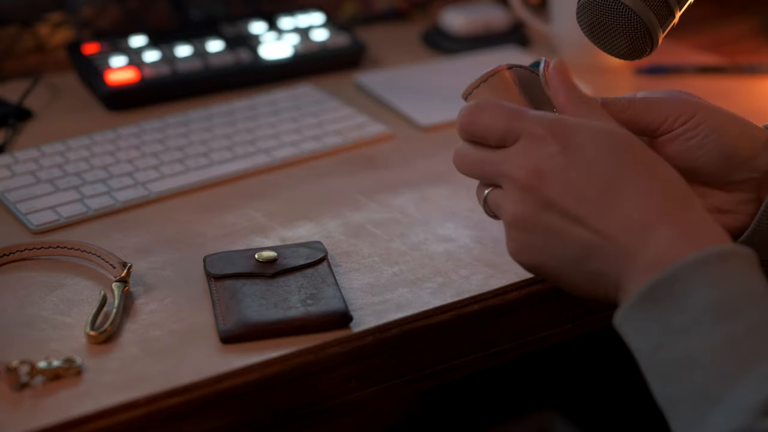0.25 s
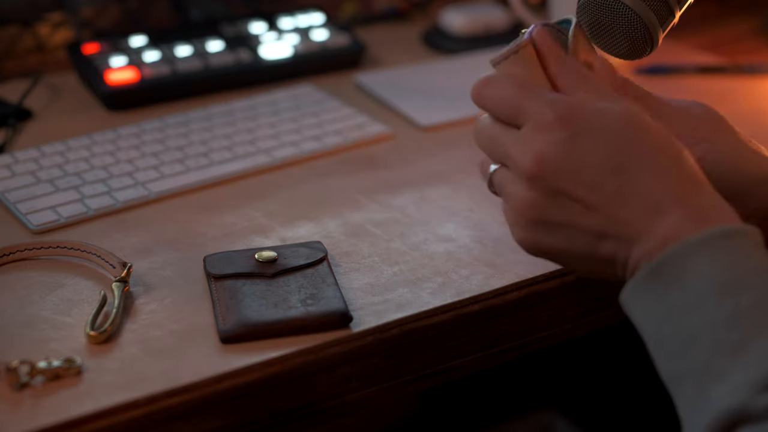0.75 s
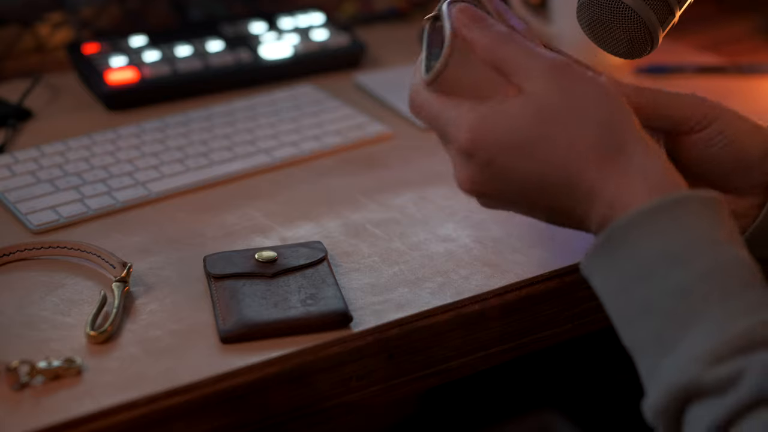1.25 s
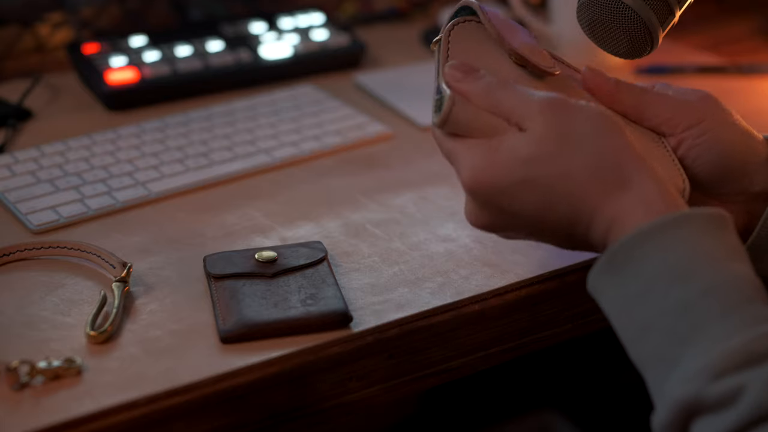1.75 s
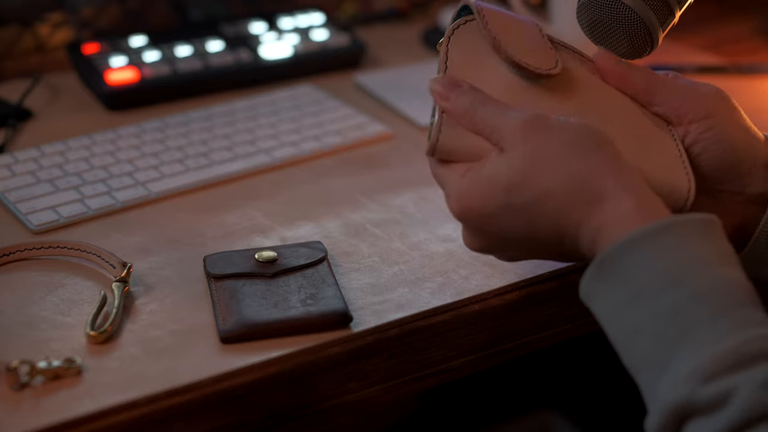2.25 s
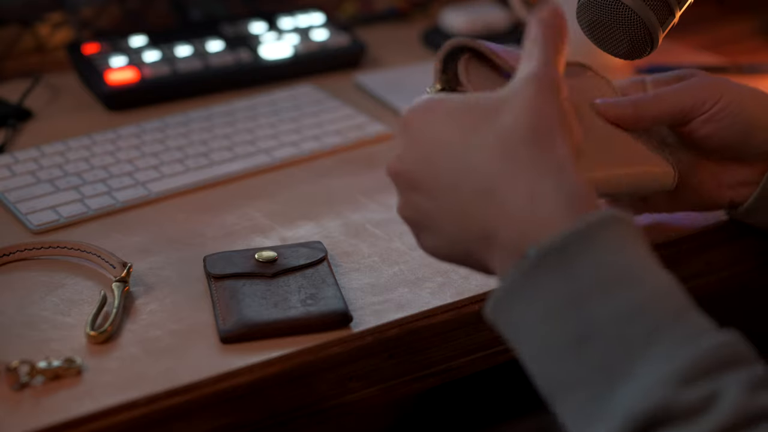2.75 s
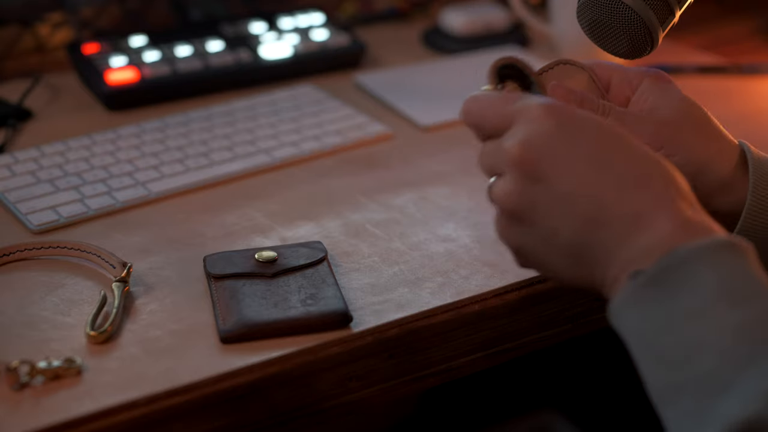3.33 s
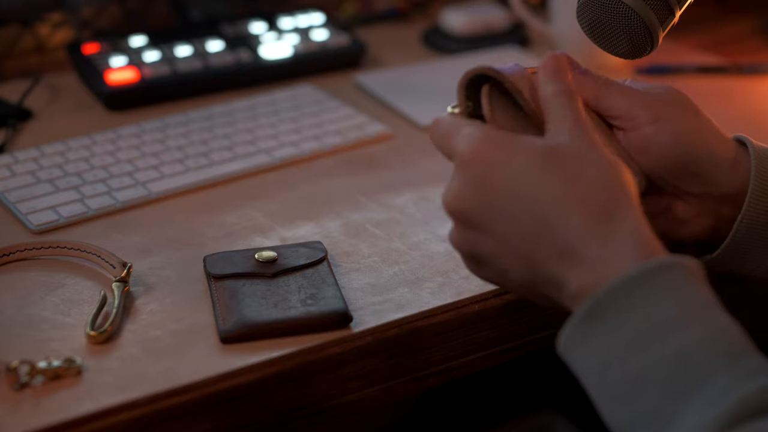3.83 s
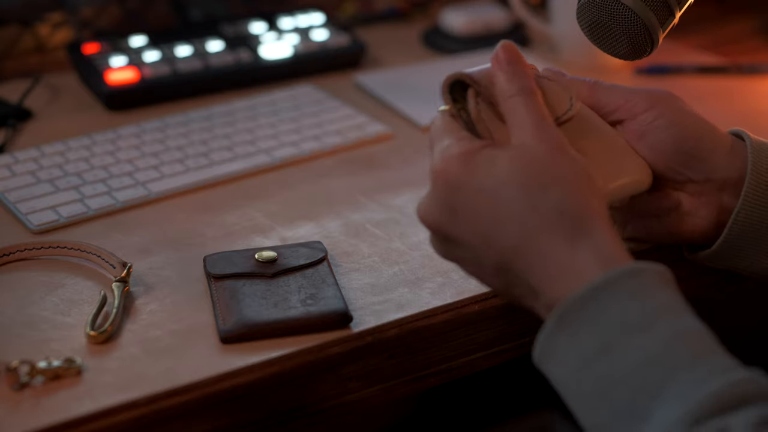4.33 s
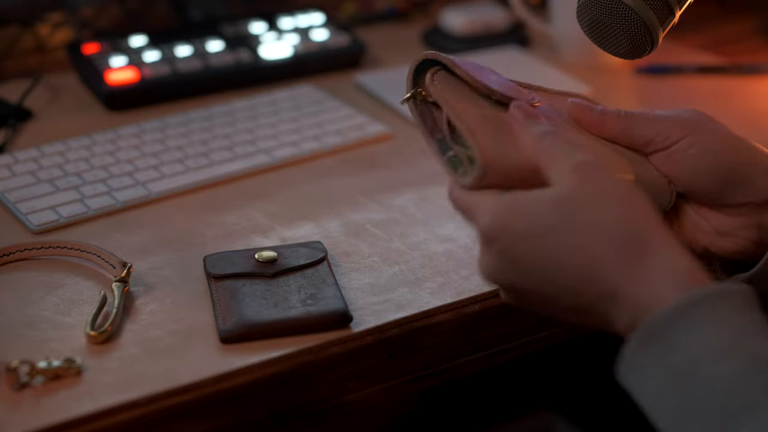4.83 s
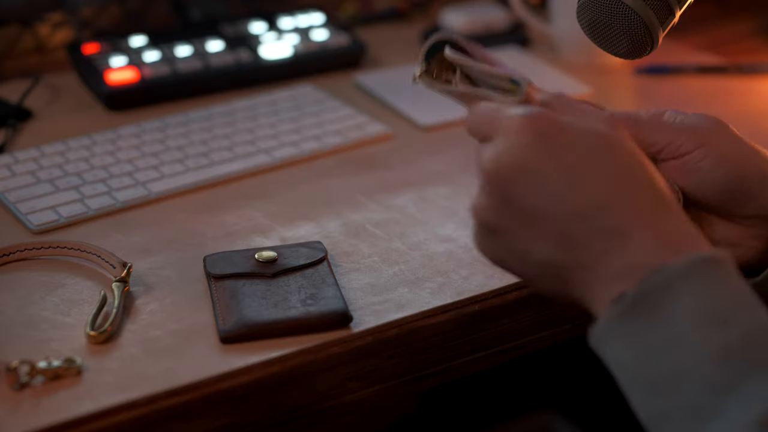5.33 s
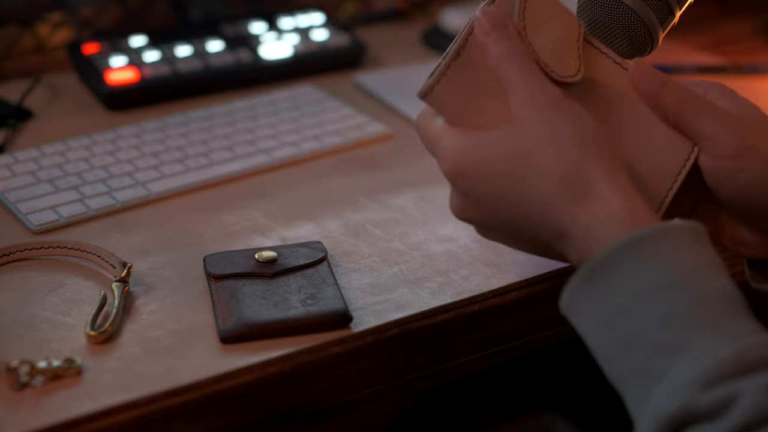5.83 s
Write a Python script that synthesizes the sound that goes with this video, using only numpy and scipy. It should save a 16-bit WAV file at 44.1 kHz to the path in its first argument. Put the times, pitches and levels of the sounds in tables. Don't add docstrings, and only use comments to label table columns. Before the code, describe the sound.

Very close to a desk microphone in a quiet room, hands work a stiff leather wallet. Sharp cracks and a dull thump come first, then a near lull. A fine creak swells into dense ticking, followed by scattered crackles. A roll pulled tight ratchets louder and louder, stops, and squeaks faintly. Kneading snaps and a brief hollow pocket note follow, fading into light rustles.

```python
import sys
import numpy as np
from scipy import signal
from scipy.fft import rfft, irfft, next_fast_len
from scipy.io import wavfile
from scipy.ndimage import uniform_filter1d, map_coordinates

SR = 44100
rng = np.random.default_rng(int(sys.argv[2]) if len(sys.argv) > 2 else 0)


def magnitude_from_level(level_db):
    exponent = np.asarray(level_db, float) / 20
    return 10 ** exponent


def waveform_to_disk(signal):
    frames = np.transpose(np.atleast_2d(signal))
    scaled = np.clip(frames, -1, 1) * 32767
    samples = np.round(scaled).astype(np.int16)
    wavfile.write(sys.argv[1], SR, samples)


N = 268128

# pitch_hz, level_db
ROOM_HISS = [(15, -40.5), (25, 0.5), (135, -4), (470, -7.5), (634, -16.5), (854, -7.5), (1360, -22),
             (8140, -19), (14800, -18.5), (16500, -16)]
# pitch_hz, width_hz, level_db
DESK_MODES = [(86.4, 23, -1.5), (158, 126, -6.5), (283, 290, -9.5)]
# pitch_hz, width_hz, level_db
POCKET_MODES = [(350, 140, -15), (656, 84, -5.5), (780, 72, -2), (1100, 654, -3), (1840, 3730, -8.5)]
# pitch_hz, level_db
GRAIN_HISS = [(530, -66), (900, -9), (1670, -2.5), (2690, -9), (3970, 0), (7850, 4), (15200, -14),
              (15900, -5), (16500, -88)]
# hardest_s, rubbing_db, swell_s, fade_s
FINGER_STROKES = [(.065, -61, 0.16, 0.28), (.234, -56, 0.12, 0.16), (0.349, -44.5, 0.013, 0.057),
                  (0.662, -50.5, 0.28, 0.12), (0.855, -60.5, 0.077, 0.063), (.95, -66, 0.065, 0.052),
                  (1.15, -78, 0.49, 0.27), (1.33, -71.5, 0.1, 0.31), (1.56, -79, 0.17, 0.037),
                  (1.907, -56, 0.27, 0.057), (2.049, -53, 0.12, 0.27), (2.2, -62.5, 0.037, 0.16),
                  (2.31, -55.5, 0.11, 0.05), (2.39, -73.5, 0.092, 0.37), (2.55, -59.5, 0.073, 0.084),
                  (2.62, -57, 0.064, 0.038), (2.672, -65.5, .04, 0.054), (2.774, -61, 0.047, 0.32),
                  (2.91, -59, 0.035, 0.065), (3.37, -54, 0.43, 0.077), (3.465, -53, 0.0067, 0.028),
                  (3.565, -55, 0.076, 0.15), (3.841, -71.5, 0.37, 0.081), (3.941, -55, 0.17, 0.25),
                  (4.178, -57, 0.038, 0.067), (4.355, -52, 0.096, 0.14), (4.5, -67, 0.06, 0.049),
                  (4.59, -74, 0.13, 0.034), (4.738, -69, .045, 0.046), (4.768, -70, 0.031, 0.054),
                  (4.855, -60.5, 0.2, 0.27), (5.013, -61, 0.22, 0.055), (5.223, -74.5, 0.22, 0.56),
                  (5.453, -58.5, 0.066, 0.062), (5.601, -62, 0.17, 0.068), (6.006, -73, 0.032, 0.038)]
# time_s, brightest_hz, cupped_db, weight_db
HAND_GRIP = [(0, 4960, 1, 2), (.35, 3980, 6.5, 3.5), (.62, 6100, -4.5, -3.5), (.8, 5500, 5.5, 0.5),
             (1.1, 6400, -4.5, -0.5), (1.62, 6400, 12, -3.5), (1.95, 4870, 7, 0), (2.35, 6300, -5.5, -7),
             (2.55, 5130, 1.5, -2), (3.299, 4130, 10.5, 3.5), (3.561, 7000, 1.5, -2),
             (3.78, 5600, -2.5, -8), (4.22, 5650, 0.5, 3), (4.37, 7900, -10, -4.5), (4.5, 2930, 4.5, 5),
             (4.63, 4000, 2, -4), (4.8, 6060, -3, -1), (5.201, 5600, 0.5, -3), (5.452, 4700, -2, 1.5)]
# start_s, peak_db, pitch_hz, t60_s
THUMPS_AND_NOTES = [(.3385, -26, 172, 0.039), (.688, -35, 186, 0.015), (.682, -37, 684, 0.0093),
                    (0.841, -60, 89, 0.33), (1.67, -54, 95, .3), (2.915, -53, 140, 0.16),
                    (4.9, -53.5, 92, 0.34), (4.437, -53, 746, 0.039), (4.449, -47, 780, 0.029),
                    (4.4575, -44.5, 814, 0.045), (4.467, -44, 804, 0.055), (4.484, -40.5, 800, 0.046),
                    (4.497, -48, 830, 0.046), (4.507, -43.5, 797, 0.052), (4.513, -49, 830, 0.028),
                    (4.52, -51, 900, 0.029), (4.527, -53, 1100, 0.038)]
# start_s, peak_db, pitch_hz
SKIN_SQUEAKS = [
    (0.38, -35.5, 1200),
    (3.5, -52, 3888),
    (3.4, -45, 3300),
    (4.6, -52.5, 1540),
    (5.443, -50, 4500),
    (6.3, -41.5, 4000),
    (5.582, -45, 6900),
    (8.4, -49, 2800),
    (5.634, -57, 4400),
]
# start_s, peak_db, brightest_hz
UNFOLD_SLIPS = [(.026, -40, 6900), (0.0702, -35, 7000), (0.075, -41, 8000), (.1055, -29, 4500),
                (0.1088, -26, 6000), (0.2035, -27, 5900), (0.3035, -33, 8000), (.3395, -19.5, 6350),
                (.3412, -13, 6050), (0.3414, -24.5, 4990), (.318, -23, 4300), (0.332, -33, 6500),
                (.36, -45.5, 3000), (0.368, -33.5, 5500), (0.385, -26.5, 6200), (0.3922, -30, 5030),
                (0.436, -35, 5680), (0.4512, -30.5, 5560), (0.4839, -28, 6400), (0.5067, -35.5, 5000),
                (.524, -38.5, 5300), (0.5454, -35, 5560), (.6078, -36, 5830), (0.638, -32, 6600),
                (0.753, -36.5, 4970), (0.829, -39, 7500), (0.946, -40, 5400), (1.1234, -60, 4200),
                (1.2124, -50.5, 6540)]
FLEX_SLIPS = [(1.7777, -26, 8800), (1.779, -30, 4500), (1.8776, -31, 4450), (1.891, -32, 5860),
              (1.9043, -23.5, 6660), (1.91, -25, 8000), (1.933, -39, 5840), (1.967, -44, 5500),
              (1.99, -35, 2300), (2.001, -40, 5500), (2.0154, -40, 6160), (2.0256, -30, 6030),
              (2.0296, -40, 3050), (2.039, -31, 4340), (2.0912, -36.5, 2100), (2.112, -34, 3200),
              (2.1325, -32, 3000), (2.167, -39, 6500), (2.186, -47, 4000), (2.217, -35, 7560),
              (2.2246, -39, 4600), (2.3033, -42, 5080), (2.324, -45, 5230), (2.343, -42, 6000),
              (2.492, -45, 6530), (2.5185, -36.5, 7100), (2.5379, -46, 1930), (2.6034, -57, 6500),
              (2.613, -39.5, 4000), (2.619, -35.5, 8000), (2.667, -48, 4500), (2.739, -51, 4500),
              (2.747, -43, 4000), (2.7545, -33.5, 4350), (2.798, -37, 8660), (2.827, -33.5, 3870)]
KNEAD_SLIPS = [(3.6928, -42, 8000), (3.742, -46, 8000), (3.8144, -42.5, 5800), (3.84, -39.5, 6970),
               (3.8585, -47, 3800), (3.8658, -38, 7500), (3.8765, -36.5, 3830), (3.8832, -38, 6800),
               (3.893, -36, 5500), (3.9, -29.5, 7050), (3.906, -35, 6720), (3.921, -40, 5500),
               (3.9525, -36, 5700), (3.9857, -35.5, 3600), (4.004, -30, 8220), (4.014, -32, 5940),
               (4.022, -35, 5710), (4.0334, -24.5, 7700), (4.0438, -28.5, 8770), (4.0547, -36, 5740),
               (4.0656, -41, 8570), (4.088, -43, 5800), (4.1042, -32.5, 5400), (4.1147, -29.5, 8110),
               (4.149, -44, 5810), (4.1562, -34, 7400), (4.165, -31, 7380), (4.1715, -37, 4400),
               (4.1808, -30, 6140), (4.2118, -36.5, 4860), (4.2452, -29, 8300), (4.2637, -42, 5350),
               (4.2805, -31, 9300), (4.3063, -34, 3360), (4.3417, -29, 9400), (4.3492, -30, 8300),
               (4.3636, -34, 7800), (4.4572, -48, 2180), (4.467, -47, 2200), (4.4843, -40, 3200),
               (4.504, -48, 9500), (4.5065, -40, 3550), (4.577, -53, 1820), (4.604, -58, 4880),
               (4.731, -54, 5000), (4.781, -46, 5500)]
SMOOTH_SLIPS = [(4.753, -38.5, 6940), (4.7646, -45.5, 4050), (4.795, -33, 6740), (4.847, -36, 7840),
                (4.86, -43, 5900), (4.8657, -41, 7500), (5.0244, -38.5, 7700), (5.1277, -42, 5360),
                (5.16, -53, 5050), (5.1685, -61, 2500), (5.2075, -42, 5540), (5.2167, -47, 5060),
                (5.226, -43.5, 5060), (5.2999, -47, 7400), (5.343, -44.5, 6360), (5.365, -50, 2070),
                (5.381, -45, 5240), (5.398, -39, 6550), (5.401, -48, 2500), (5.4276, -45.5, 1980),
                (5.4407, -40, 5030), (5.4459, -44, 2160), (5.459, -52, 3500), (5.588, -38, 4000),
                (5.6308, -43.5, 4450), (5.633, -40, 6960), (5.6797, -59, 4130)]
# start_s, peak_db, brightest_hz
EARLY_TICKS = [(0.0864, -41, 5700), (0.1501, -40, 5700), (0.1639, -40.5, 8300), (0.1716, -59, 5500),
               (0.1894, -34, 5600), (0.1977, -40, 6500), (0.215, -41, 6700), (0.229, -33.5, 3250),
               (0.249, -33.5, 4500), (0.2573, -36, 4000), (0.275, -38.5, 4350), (0.29, -52, 3900),
               (0.3111, -45.5, 4080), (0.348, -28.5, 6500), (0.3995, -34.5, 6520), (0.406, -35, 6500)]
DRAG_TICKS = [(4.3015, -36, 6700), (4.3163, -48, 5100), (4.3213, -37, 3900), (4.3304, -31.5, 8800),
              (4.3333, -47, 4100), (4.354, -40, 8600), (4.3775, -40, 7400), (4.3885, -33, 8300),
              (4.3923, -41, 6500), (4.408, -50, 5800), (4.84, -43, 7500), (4.8716, -46, 6600),
              (4.88, -44, 8000), (4.902, -49, 7800), (4.909, -45, 6000), (4.919, -45, 7000),
              (4.929, -49, 6500), (4.9387, -47, 5970), (4.945, -44, 7000), (4.9567, -45, 6800),
              (4.9657, -46, 6700), (4.9753, -47, 5200), (4.9873, -46, 6300), (5.0002, -53, 5400),
              (5.0095, -55, 5300), (5.019, -55, 7000), (5.3487, -42, 8750), (5.359, -48, 6000),
              (5.4142, -46, 1490), (5.4499, -44.5, 1490), (5.4657, -51, 1500), (5.498, -52, 8000),
              (5.5281, -52, 6100), (5.5576, -52, 6300)]
# pitch_hz, width_hz, level_db
BENT_FOLD_MODES = [(3030, 420, -5.5), (5800, 320, -23), (7400, 1300, -2.5), (8800, 920, 8)]
ROLLED_FOLD_MODES = [(3110, 240, -0.5), (4600, 800, 9), (5390, 220, -5), (7700, 800, -5)]
# start_s, peak_db
FLAP_SLIPS = [(1.4282, -52), (1.438, -52), (1.4422, -52), (1.4504, -53), (1.4556, -50), (1.4727, -51),
              (1.4814, -55), (1.4882, -52), (1.4951, -50), (1.5028, -50), (1.5085, -50), (1.518, -52),
              (1.5245, -51), (1.5311, -49), (1.5384, -46), (1.5468, -48), (1.5561, -49), (1.5658, -50),
              (1.5773, -52), (1.5861, -52), (1.5958, -47), (1.6057, -45), (1.6142, -56), (1.6194, -42),
              (1.6302, -38), (1.6392, -50), (1.6456, -34), (1.659, -32), (1.6718, -31), (1.6778, -43),
              (1.6872, -29), (1.6925, -42), (1.7039, -31), (1.72, -34), (1.7305, -29), (1.7383, -31),
              (1.7455, -32), (1.7538, -37), (1.7618, -40), (1.7661, -40), (1.7737, -39), (1.7844, -30),
              (1.7936, -35), (1.8056, -32), (1.8184, -33), (1.8273, -30), (1.8321, -34), (1.8385, -36),
              (1.8449, -34), (1.8524, -33), (1.8608, -38)]
# start_s, peak_db
ROLL_TICKS = [(3.0388, -28), (3.0625, -27), (3.0832, -24), (3.108, -27), (3.1249, -26), (3.1368, -27),
              (3.1535, -26), (3.1764, -23), (3.2037, -24), (3.2238, -23), (3.2395, -23), (3.2605, -22),
              (3.2792, -28), (3.2976, -16), (3.3209, -17), (3.3328, -22), (3.3439, -18), (3.3651, -16),
              (3.3744, -19), (3.3944, -15)]
# start_s, peak_db, brightest_hz
ROLL_SCUFFS = [(2.8644, -43, 4100), (2.8746, -42, 4300), (2.8819, -40, 4600), (2.8921, -37, 6800),
               (2.9074, -40, 3700), (2.9259, -37, 3700), (2.9307, -38, 6500), (2.9441, -37, 6600),
               (2.9529, -35, 6500), (2.9609, -32, 6400), (2.9689, -32, 6600), (2.978, -31, 5800),
               (2.9875, -38, 5000), (2.997, -38, 5400), (3.0084, -35, 5600), (3.0137, -42, 7500),
               (3.0182, -34, 3900), (3.0291, -33, 3400), (3.0344, -32, 4000), (3.0511, -34, 5200),
               (3.0571, -38, 5200), (3.0766, -33, 4000), (3.0945, -31, 5300), (3.0997, -35, 4600),
               (3.1157, -37, 6700), (3.1427, -33, 4500), (3.162, -35, 5000), (3.1821, -31, 4200),
               (3.1893, -36, 4400), (3.1986, -29, 4400), (3.2143, -38, 4500), (3.2335, -29, 4100),
               (3.2492, -26, 7200), (3.2565, -26, 5500), (3.2735, -29, 5000), (3.2879, -26, 5600),
               (3.3022, -27, 5600), (3.3133, -32, 3300), (3.3385, -27, 4800), (3.3521, -27, 3900),
               (3.3569, -32, 3100), (3.3788, -25, 4500), (3.3887, -33, 4500), (3.4036, -35, 5400),
               (3.4152, -39, 4000), (3.4198, -42, 2500)]
# first_s, last_s, slips_per_s, first_db, last_db
ROLL_TRAINS = [
    (3.4569, 3.4794, 133, -35, -37),
    (3.5284, 3.5538, 118, -40, -32),
    (3.5608, 3.5879, 148, -29, -35),
    (3.6444, 3.6775, 122, -38, -40),
    (3.752, 3.803, 137, -51, -48),
]
# start_s, peak_db, brightest_hz, knock_db
LOUD_CRACKS = [(0.0503, -27, 4000, -5.5), (0.103, -28, 4000, -9), (0.1776, -18.5, 5150, -4.5),
               (0.2233, -17, 5800, -8), (0.262, -21.5, 4550, -6), (0.339, -19.5, 5400, 3),
               (0.5898, -13.5, 8160, -23), (0.6999, -33.5, 3250, 3), (1.873, -24.5, 5700, -5),
               (1.9188, -26.5, 4230, -0.5), (1.977, -26.5, 2540, 0), (2.0528, -23.5, 5960, -12),
               (2.071, -39, 2580, 13.5), (2.0785, -29, 6000, -20), (3.9341, -21, 5330, -11.5),
               (5.607, -33.5, 5800, -20)]

ROOM_DB = -78
SHAKE_DB, SHAKE_AT_DB, SHAKE_GROWS = -65, -58.5, 0.71
SWELL_DB, TOUCH_DB_PER_S, LIFT_DB_PER_S = 15, 250, 87.5
RESTING_GRIP_DB = -85
KNOCK_DB, KNOCK_HZ, KNOCK_DB_PER_OCTAVE = -10, 4000, -5.5
JITTER, SPREAD_DB = 0.07, 1.5
TUBE_HZ, TUBE_T60_S, TUBE_DB, TUBE_GROWS, TUBE_WANDER = 680, 0.028, -46, 0.32, 0.1
FLAP_FLAT_S, ROLL_SHUT_S = 1.775, 3.02
NOTE_ROUGH = 0.035


def unit(x):
    return x / np.sqrt(np.mean(x ** 2) + 1e-20)


def filtered(x, response):
    size = next_fast_len(x.shape[-1] + 4096)
    spectrum = rfft(x, size) * response(np.fft.rfftfreq(size, 1 / SR))
    return irfft(spectrum, size)[..., :x.shape[-1]]


def colour(points):
    f, db = np.transpose(points)
    return lambda hz: magnitude_from_level(np.interp(np.log(hz + 1), np.log(f + 1), db))


def modes(table):
    def response(f):
        total = 0
        for k, (c, width, db) in enumerate(table):
            total = total + (-1) ** k * magnitude_from_level(db) * 1j * f * width / (c * c - f * f + 1j * f * width)
        return total
    return response


def wobble(rate):
    knots = rng.standard_normal(int(N * 200 / SR) + 4)
    return map_coordinates(knots, [np.arange(N) * min(rate, 200) / SR])


def hands(control):
    t = np.arange(0, N + 64, 64) / SR
    s, db, swell, fade = np.transpose(FINGER_STROKES)[:, :, None]
    lost = SWELL_DB * np.maximum((s - t) / swell, (t - s) / fade)
    lost += TOUCH_DB_PER_S * np.maximum(s - swell - t, 0)
    lost += LIFT_DB_PER_S * np.maximum(t - s - fade, 0)
    effort_db = 10 * np.log10(np.sum(magnitude_from_level(db - lost) ** 2, axis=0) + magnitude_from_level(RESTING_GRIP_DB) ** 2)
    grip_s, hz, cupped_db, weight_db = np.transpose(HAND_GRIP)
    shake_db = SHAKE_DB + SHAKE_GROWS * (effort_db - SHAKE_AT_DB)
    controls = {
        "rubbing_db": effort_db,
        "brightest_hz": np.interp(t, grip_s, hz),
        "pocket_db": effort_db + np.interp(t, grip_s, cupped_db),
        "shake_db": shake_db + np.interp(t, grip_s, weight_db)}
    return np.interp(np.arange(N) / SR, t, controls[control])


def scatter(s, shapes):
    at = np.round(s * SR).astype(int)[:, None] + np.arange(shapes.shape[1])
    return np.bincount(at.ravel(), shapes.ravel(), N + SR)[:N]


def cracks(hz, size, spike, rise, t60, alike, sharpness, edge_db):
    t = np.arange(size) / SR
    noise = rng.standard_normal((len(hz), size + 1))
    life = t60 * (5000 / hz[:, None]) ** 0.6 * np.exp(0.15 * noise[:, -1:])
    share = np.clip(alike, 0, 1)
    chatter = share * noise[0, :-1] + np.sqrt(1 - share ** 2) * noise[:, :-1]
    chatter = chatter * magnitude_from_level(-60 * t / life) * (1 - np.exp(-t / rise))
    chatter *= np.exp(0.45 * rng.standard_normal(chatter.shape))
    chatter[:, round(rise * SR)] += spike * np.sign(noise[:, -1] - 2 * share)
    c, f = hz[:, None], np.fft.rfftfreq(2 * size, 1 / SR)
    patch = 1j * f * c / sharpness / (c * c - f * f + 1j * f * c / sharpness)
    patch = patch ** 2 + magnitude_from_level(edge_db) * 1j * f / (1500 + 1j * f)
    patch = patch / (1 + 1j * f / (3 * c)) ** 2 / (1 + 1j * f / 15000) ** 2
    out = irfft(rfft(chatter, 2 * size) * patch, 2 * size)[:, :size]
    return out / np.abs(out).max(axis=1, keepdims=True)


def slips(s, db, hz, knock_db, rise, **kind):
    shapes = cracks(hz, size=1024, rise=rise, **kind)
    t = np.arange(256) / SR
    push = magnitude_from_level(-60 * t / 0.016) * (0.57 + rng.standard_normal((len(s), 256)))
    knocks = scatter(s, (magnitude_from_level(db) * magnitude_from_level(knock_db))[:, None] * push)
    pocket = magnitude_from_level(8.0) * filtered(knocks, modes(POCKET_MODES))
    desk = magnitude_from_level(-21.5) * filtered(knocks, modes(DESK_MODES))
    return scatter(s - rise, magnitude_from_level(db)[:, None] * shapes) + pocket + desk


def creak(table, fold, ring_db, level_db, **kind):
    s, db = np.transpose(table)
    hz = hands("brightest_hz")[(s * SR).astype(int)] * np.exp(0.04 * rng.standard_normal(len(s)))
    run = slips(s, db + level_db, 1.2 * hz, **kind)
    return filtered(run, lambda f: 1 + magnitude_from_level(ring_db) * modes(fold)(f))


def trains(table):
    rows = []
    for first, last, rate, first_db, last_db in table:
        u = np.linspace(0, 1, round((last - first) * rate) + 1)
        chance = rng.standard_normal((len(u), 2))
        late = JITTER / rate * chance[:, 0] * np.sin(np.pi * u)
        s = first + u * (last - first) + late
        db = first_db + u * (last_db - first_db) + SPREAD_DB * chance[:, 1]
        rows += zip(s, db)
    return rows


def quiet_room():
    return magnitude_from_level(ROOM_DB + 1.0) * unit(filtered(rng.standard_normal(N), colour(ROOM_HISS)))


def shake():
    jolts = rng.standard_normal(N) * magnitude_from_level(1.2 * wobble(14))
    return magnitude_from_level(hands("shake_db") + 3.0) * unit(filtered(jolts, modes(DESK_MODES)))


def rubbing():
    uneven = magnitude_from_level(1.5 * wobble(30) + 2.5 * wobble(120))
    hiss = unit(uneven * filtered(rng.standard_normal(N), colour(GRAIN_HISS)))
    dull = filtered(hiss, lambda hz: 1 / (1 + 1j * hz / 5200) ** 2)
    hiss = dull + (hands("brightest_hz") / 6000) ** 0.42 * (hiss - dull)
    jerks = rng.standard_normal(N) * magnitude_from_level(1.2 * wobble(90))
    pocket_air = unit(filtered(jerks, modes(POCKET_MODES)))
    return magnitude_from_level(hands("rubbing_db") + 3.0) * hiss + magnitude_from_level(hands("pocket_db") - 0.5) * pocket_air


def rings():
    s, db, hz, t60 = np.transpose(THUMPS_AND_NOTES)[:, :, None]
    t = np.arange(8192) / SR
    steps = rng.standard_normal((len(s), len(t)))
    drift = NOTE_ROUGH * hz / 800 * np.cumsum(steps, axis=1)
    tone = np.sin(2 * np.pi * hz * t + drift)
    return scatter(s[:, 0], magnitude_from_level(db - 60 * t / t60) * tone * (1 - np.exp(-t / 0.00017)))


def squeaks():
    return slips(*np.transpose(SKIN_SQUEAKS), knock_db=-41, spike=0, rise=0.0052, t60=0.14,
                 alike=0, sharpness=5.4, edge_db=-14.5)


def crackle(count=2600):
    draw = rng.random((count, 3))
    s = np.sort(draw[:, 0]) * (N - 1) / SR
    at = (s * SR).astype(int)
    size_db = -3 * np.log(draw[:, 1] + 0.12) + 2.3 * wobble(45)[at]
    hz = hands("brightest_hz")[at] * 0.51 ** (draw[:, 2] - 0.5)
    shapes = cracks(hz, size=384, spike=4.2, rise=0.00065, t60=0.0062,
                    alike=0, sharpness=0.24, edge_db=-3.5)
    return magnitude_from_level(hands("rubbing_db") - 7.0) * unit(scatter(s, magnitude_from_level(size_db)[:, None] * shapes))


def tube():
    inside = [row[:-1] for row in ROLL_SCUFFS if row[0] > ROLL_SHUT_S]
    s, db = np.transpose(ROLL_TICKS + inside)[:, :, None]
    t = np.arange(2048) / SR
    chance = rng.standard_normal((len(s), 2))
    level_db = TUBE_DB + TUBE_GROWS * (db - db.mean()) + 2 * SPREAD_DB * chance[:, :1]
    hz = TUBE_HZ * np.exp(TUBE_WANDER * chance[:, 1:])
    note = magnitude_from_level(level_db - 60 * t / TUBE_T60_S) * np.sin(2 * np.pi * hz * t)
    return scatter(s[:, 0], note * (1 - np.exp(-t / 0.0016)))


def scuffs():
    return slips(*np.transpose(ROLL_SCUFFS), knock_db=-12.5, spike=7, rise=0.0006, t60=0.021,
                 alike=0.4, sharpness=1.1, edge_db=-22)


def roll():
    ticks = creak(trains(ROLL_TRAINS) + ROLL_TICKS, ROLLED_FOLD_MODES, ring_db=-3.5, level_db=0.5,
                  knock_db=-17, spike=15, rise=0.0003, t60=0.022, alike=0.75, sharpness=0.85,
                  edge_db=-13.0)
    return ticks + magnitude_from_level(0.5) * scuffs()


def flap():
    kind = dict(spike=4, rise=0.0006, t60=0.018, alike=0.6, sharpness=0.55, edge_db=-7)
    bending = [row for row in FLAP_SLIPS if row[0] < FLAP_FLAT_S]
    lying = [row for row in FLAP_SLIPS if row[0] > FLAP_FLAT_S]
    bent = creak(bending, BENT_FOLD_MODES, ring_db=2.0, level_db=-2, knock_db=-4.0, **kind)
    flat = creak(lying, ROLLED_FOLD_MODES, ring_db=-21, level_db=0.5, knock_db=-6, **kind)
    return bent + flat


def snaps():
    gestures = UNFOLD_SLIPS + FLEX_SLIPS + KNEAD_SLIPS + SMOOTH_SLIPS
    s, db, hz = np.transpose(gestures + EARLY_TICKS + DRAG_TICKS)
    knock_db = KNOCK_DB + KNOCK_DB_PER_OCTAVE * np.log2(hz / KNOCK_HZ)
    small = slips(s, db, hz, knock_db, spike=3.2, rise=0.0006, t60=0.019,
                  alike=0, sharpness=0.67, edge_db=-24.0)
    loud = slips(*np.transpose(LOUD_CRACKS), spike=8.3, rise=0.0008664, t60=0.027,
                 alike=0, sharpness=0.51, edge_db=-15.0)
    return small + loud


def scene():
    room = quiet_room()
    folds = snaps() + flap() + roll()
    handling = crackle() + rings() + rubbing() + shake()
    tones = squeaks() + tube()
    return (room + folds + handling + tones)[None]


def top_cut(x):
    return signal.sosfilt(signal.butter(12, 16820, fs=SR, output="sos"), x)


def record(dry):
    level = np.abs(dry)
    squeeze = np.abs(uniform_filter1d(level, size=8192)) ** 0.27
    sag = squeeze * filtered(level, lambda hz: 1.5 / (1 + 1j * hz / 30))
    band = filtered(dry - sag, lambda hz: 1 / np.sqrt(1 + (hz / 15900) ** 60))
    return top_cut(band)


dry = scene()
out = record(dry)
waveform_to_disk(out)
```